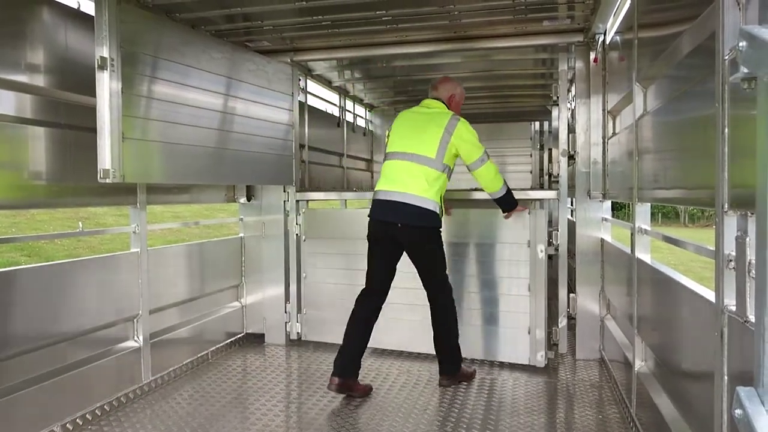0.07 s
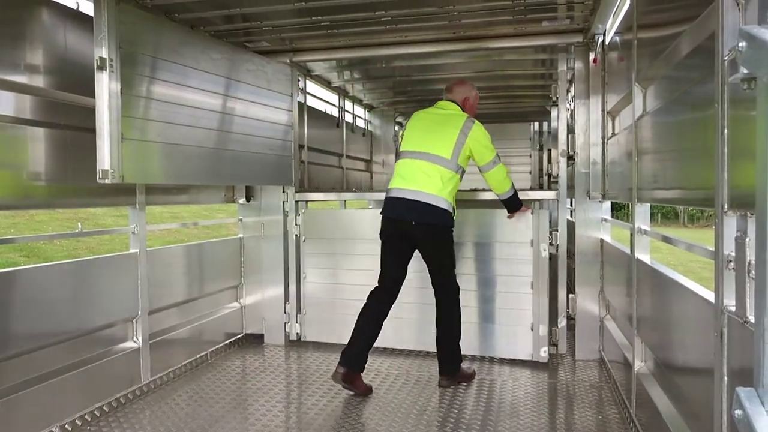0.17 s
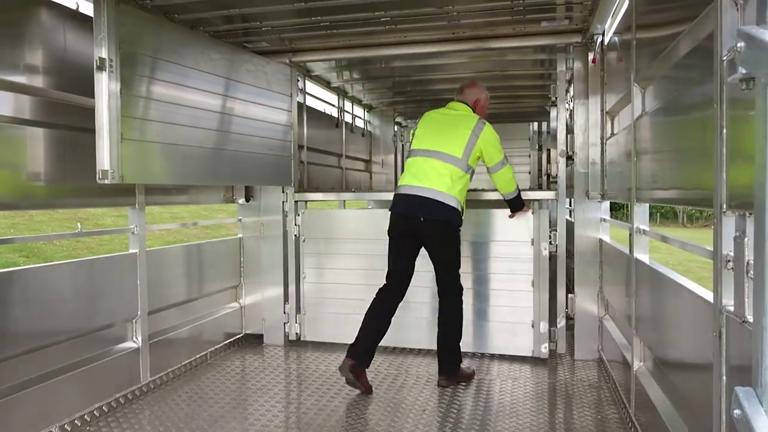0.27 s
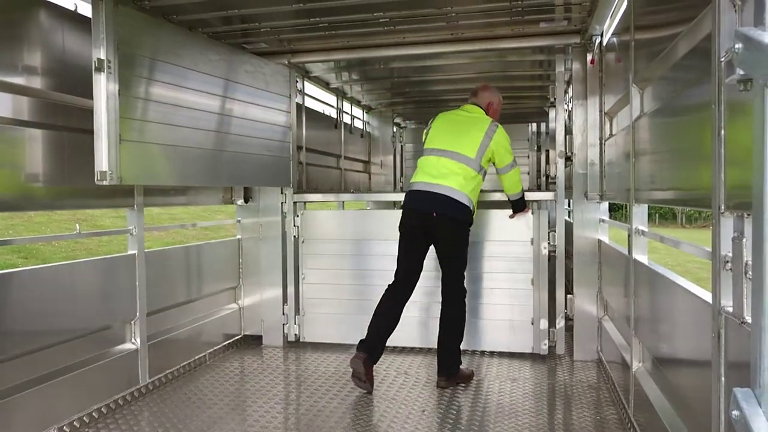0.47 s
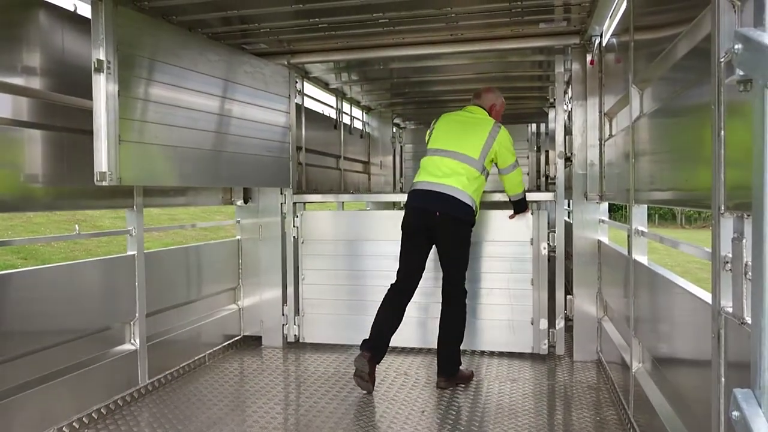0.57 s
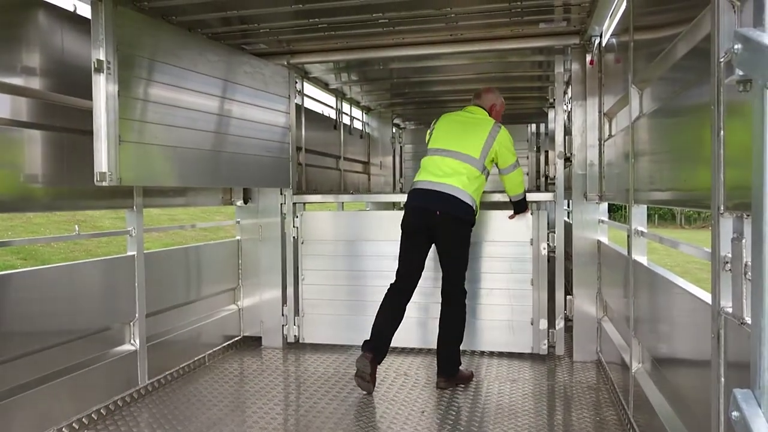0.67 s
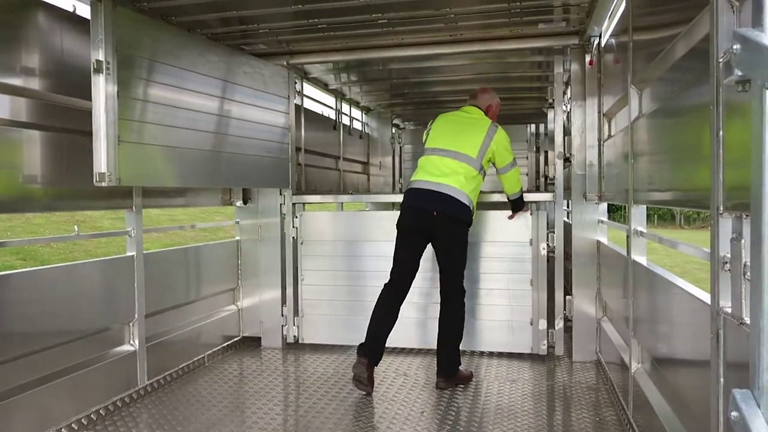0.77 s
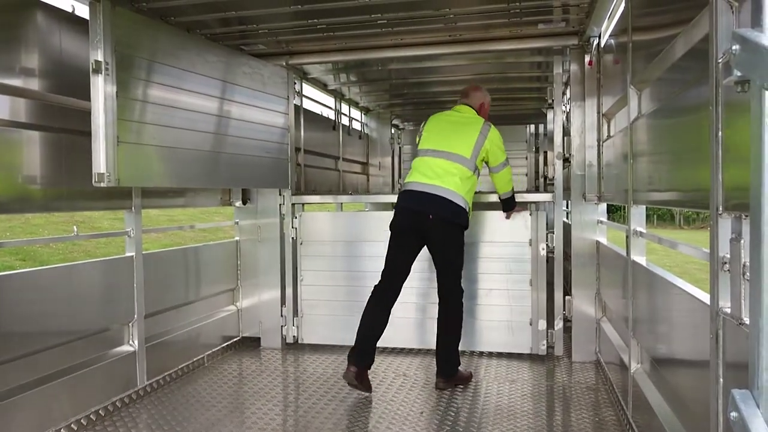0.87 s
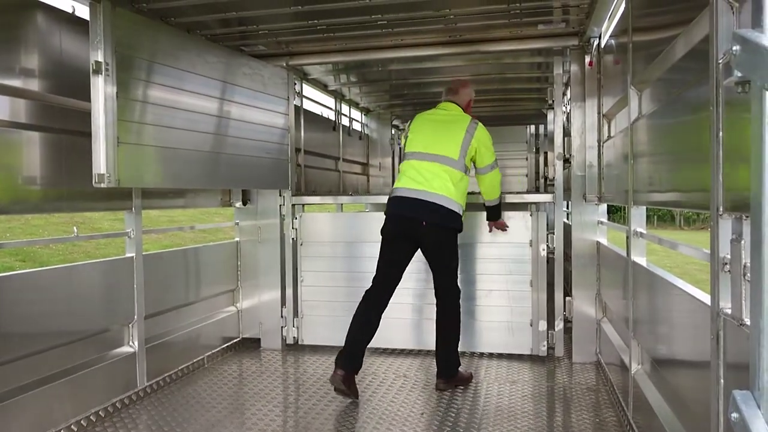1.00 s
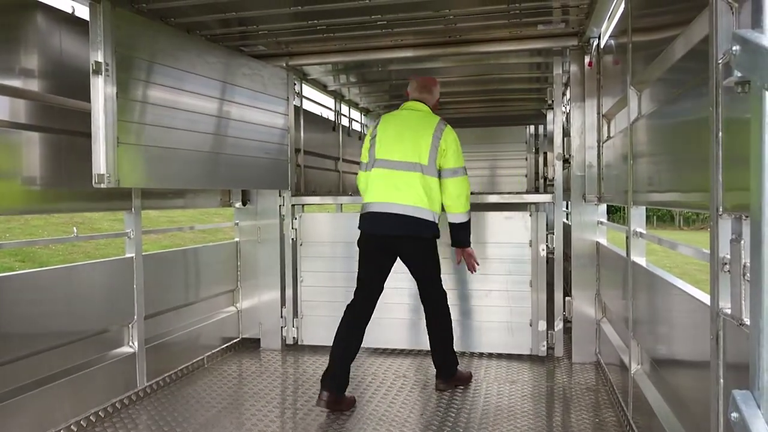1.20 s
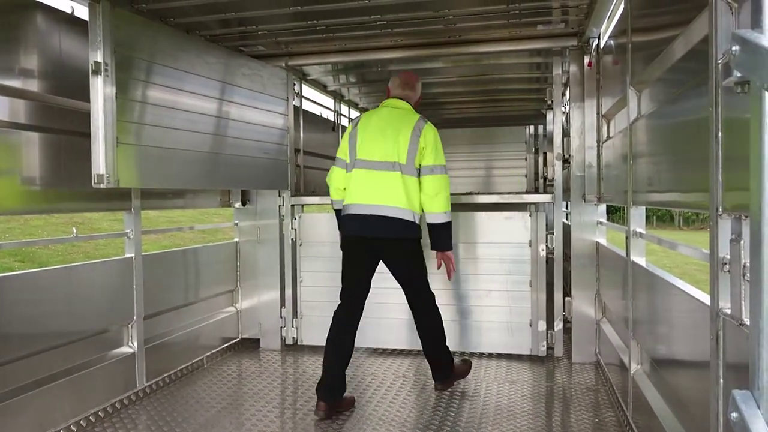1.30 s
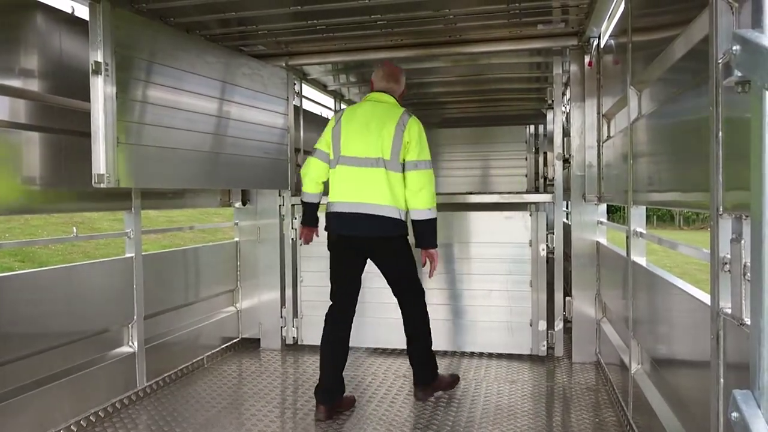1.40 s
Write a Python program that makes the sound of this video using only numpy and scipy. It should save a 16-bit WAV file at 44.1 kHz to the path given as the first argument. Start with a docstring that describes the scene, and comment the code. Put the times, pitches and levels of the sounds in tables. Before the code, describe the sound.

A metal partition gate bangs shut just after a few latch clicks, rebounding with a rattle and a hollow boom. Heard from inside the metal trailer, the ringing fades into soft steps and a low rumble from outside.

```python
"""An aluminium partition gate slams, rattles and rebounds as a man shuts it in a metal livestock trailer.
First the latch bolt clatters back; then each impact excites the panel's modes, and the walls reverberate.
The deck flexes and booms under steps and blows, loose fittings tick, and a low outdoor rumble enters
through the vents. Gain control flattens the bang."""
import sys
import numpy as np
from scipy import signal
from scipy.fft import rfft, irfft
from scipy.io import wavfile
from scipy.ndimage import uniform_filter1d, minimum_filter1d

SR = 44100
rng = np.random.default_rng(int(sys.argv[2]) if len(sys.argv) > 2 else 0)


def log_audio(samples):
    """Write samples as a 16-bit WAV file to the path given in sys.argv[1]."""
    # one column per channel
    frames = np.atleast_2d(samples).T
    # limit to full scale, then quantise
    limited = np.clip(frames, -1, 1)
    pcm = np.round(limited * 32767).astype(np.int16)
    wavfile.write(sys.argv[1], SR, pcm)


N = 63945

# reverberation of the trailer: frequency_hz, t60_s
TRAILER_DECAY = [(60, 2.5), (150, 2.06), (320, 1.35), (650, 0.63), (1500, 0.67), (3500, 0.68), (7500, 0.5),
                 (15000, 0.3)]
# likeness of the two channels: frequency_hz, coherence_ratio
COHERENCE = [(60, 0.86), (280, 0.98), (550, 0.74), (1000, 0.28), (2000, .1), (12000, 0.079)]
# stereo balance: frequency_hz, left_minus_right_db
STEREO_BALANCE = [(40, -10.5), (125, -7.5), (250, -4.5), (500, -5.5), (1000, -2), (2000, -7), (4000, -1),
                  (8000, -4.5), (14000, -1)]
# spectrum of the outdoor rumble: frequency_hz, relative_db
RUMBLE_SPECTRUM = [(28, -32), (42, -10.5), (54, 4.5), (80, -3), (140, -1.5), (220, -1), (350, -7.5),
                   (560, -14.5), (850, -9), (1400, -15.5), (2200, -15.5), (3000, -28), (5500, -38.5),
                   (7500, -36.5), (9300, -55.5), (15500, -64)]
# contacts of the bolt as it is drawn back: start_s, level_db, treble_db
BOLT_CONTACTS = [(-.08, -28.5, -17), (.2095, -29, 6), (.2165, -27.5, -3), (.2255, -32, 5.5),
                 (.2323, -24.5, 5), (.2362, -35.5, -18), (.267, -36, -10), (.3115, -33, 7)]
# broad spectrum of a bolt contact: frequency_hz, relative_db
BOLT_SPECTRUM = [(100, -30), (700, -33), (1300, 0.5), (2200, 3), (3000, -2), (4000, 1.5), (4800, -13.5),
                 (5700, -12), (6300, -14), (7600, -0.5), (8700, -21), (9500, -29), (10700, -21),
                 (12300, -33), (13500, -17), (15500, -34)]
# resonances of the bolt: pitch_hz, width_hz, relative_db
BOLT_RESONANCES = [(1606, 12, 14), (2160, 60, 11.5), (2240, 11, 19), (2700, 30, 14.5), (3738, 28, 14.5),
                   (4030, 99, 10.5), (4326, 37, -3), (5600, 97, 7), (6970, 35, 3), (7620, 78, 12.5),
                   (10500, 110, -8)]
# contacts of loose fittings: start_s, level_db, relative_ring_db
FITTING_TICKS = [(-.04, -45.5, -10), (1.171, -46.5, -21), (1.178, -46.5, -7), (1.196, -56, 2),
                 (1.429, -50, -12)]
# spectrum of a tick: frequency_hz, relative_db
FITTING_SPECTRUM = [(200, 15), (1000, -22), (2500, -4.5), (4000, 2), (5500, -8.5), (7600, -1), (9300, -20),
                    (11000, -16.5), (15500, -17)]
# the one mode of a fitting: pitch_hz, relative_db, t60_s
FITTING_RING = [(6643, 0, 0.48)]
# deck and walls flexing under steps and blows: start_s, level_db, pitch_hz, t60_s
DECK_BOOMS = [(-.01, -28, 215.8, 0.26), (.075, -31, 127, 0.32), (.145, -31, 91, .18),
              (.345, -35.5, 81, 0.35), (.46, -25.5, 96, 0.18), (0.543, -17, 87, 0.082),
              (.635, -36.5, 77.3, 0.29), (.745, -35.5, 84.4, 0.49), (0.789, -31.5, 151, 1),
              (0.886, -36.5, 230, 0.71), (.96, -33.5, 123, 0.24), (1.064, -52, 166, 0.17),
              (1.249, -31, 81.3, 0.23)]
# catch brushing its keeper just before the slam: start_s, level_db
CATCH_CONTACTS = [(0.385, -30.5), (0.389, -28), (0.3958, -40)]
# spectrum of the keeper: frequency_hz, relative_db
KEEPER_SPECTRUM = [(200, -40), (700, -24), (1400, 0), (2200, 1.5), (3000, -4), (3800, 7.5), (4700, -11),
                   (5600, -7), (7600, -4), (9400, -24), (15500, -20)]
# gate striking its frame: start_s, level_db, treble_db, bass_db
GATE_BLOWS = [(0.4131, -19.5, -7.5, -9), (.4185, -8.5, -4, -7.5), (0.4282, -15.5, 2.5, 4),
              (0.4606, -22, 5, -5), (0.4676, -16, 2, -1.5), (.498, -15.5, 7, -6), (.551, -15, 0, 1.5),
              (0.5584, -12, -3, -4.5), (.582, -14.5, 3, 1.5), (.598, -16.5, -5, -0.5), (.634, -19, -6, 1)]
# broad spectrum of the struck panel: frequency_hz, relative_db
PANEL_SPECTRUM = [(30, -58), (70, -23), (125, -5), (240, -5), (330, -1), (450, -2), (640, -6), (850, 1.5),
                  (1400, -1.5), (2100, -1), (2700, -7.5), (3700, -7), (4700, -12.5), (6300, -13),
                  (7300, -9), (8300, -17), (9400, -34), (11000, -30), (15500, -33.5)]
# modes of the panel: pitch_hz, slam_weight_db, rebound_weight_db, t60_s
GATE_MODES = [(326.8, -7, -4, 0.38), (326.7, -1, -13, 1), (358.5, 0, 0, 0.97), (487, -2.5, -27, 0.4),
              (730, -2.5, 4.5, 0.4), (784, 2, 2, 0.21), (873, -12.5, 2.5, 0.56), (915, -15, -2.5, 0.57),
              (1069, 5.5, -5, 0.41), (1315.5, 0, 5, 0.5), (1360, 6.5, -11, 0.71), (1423, 5.5, 2.5, 0.44),
              (1441, -5, 3.5, 0.45), (1485, 7, 7.5, 0.6), (1525, -20, 5.5, 0.29), (1756, -13, -20, 0.2),
              (1779, 5.5, -4, 0.62), (1787, 4, -20, 0.44), (1894, 0, -2, 0.74), (2008, 9, -8, 0.18),
              (2140, 11.5, -15, 0.2), (2261, 7.5, -15, 0.56)]
# soles landing on the deck: start_s, level_db
FOOTFALLS = [(1.126, -43.5), (1.191, -38), (1.27, -43)]
# spectrum of a footfall: frequency_hz, relative_db
SOLE_SPECTRUM = [(50, 2), (200, -9), (400, 7), (600, -22), (950, 2.5), (2000, -28), (4000, -38),
                 (15000, -85)]

RESPONSE_SAMPLES, ONSET_S = 49152, 0.00085
T, HZ = np.arange(RESPONSE_SAMPLES) / SR, np.fft.rfftfreq(RESPONSE_SAMPLES, 1 / SR)
TREBLE_HZ, BASS_HZ = 2780, 396
TREBLE_SHELF, BASS_SHELF = HZ ** 4 / (HZ ** 4 + TREBLE_HZ ** 4), 1 / (1 + (HZ / BASS_HZ) ** 2)


def amp(db):
    """Amplitude grows tenfold for every 20 dB."""
    return 10 ** (np.asarray(db) / 20)


def unit(x):
    """Normalisation to an rms of 1."""
    return x / np.sqrt(np.mean(abs(x) ** 2) + 1e-20)


def curve(points, hz):
    """Interpolation on a logarithmic frequency axis."""
    knots_hz, values = np.transpose(points)
    return np.interp(np.log(hz + 1), np.log(knots_hz + 1), values)


def add(mix, start_s, sound):
    """Superposition: a stereo sound adds to the mix from start_s, which may be negative."""
    at = round(start_s * SR)
    sound, part = sound[:, max(-at, 0):], mix[:, max(at, 0):]
    part[:, :sound.shape[1]] += sound[:, :part.shape[1]]


def stereo(spectra, hz):
    """Partial coherence: two independent spectra blend, alike in the bass and louder on the right."""
    coherence, lean = curve(COHERENCE, hz), amp(curve(STEREO_BALANCE, hz) / 2)
    left = coherence * spectra[0] + np.sqrt(1 - coherence ** 2) * spectra[1]
    return np.array([left * lean, spectra[0] / lean])


def colour(x, shape_db):
    """Minimum-phase filtering: a folded cepstrum gives a causal response, here of unit rms gain."""
    cepstrum = irfft(np.log(unit(amp(shape_db)) + 1e-6))
    cepstrum[1:RESPONSE_SAMPLES // 2] *= 2
    cepstrum[RESPONSE_SAMPLES // 2 + 1:] = 0
    return irfft(rfft(x) * np.exp(rfft(cepstrum)))


def decay(t, t60_s):
    """Damping: amplitude falls exponentially, by 60 dB in t60_s."""
    return np.exp(-np.log(1000) * t / np.maximum(t60_s, 1e-3))


def free_vibration(modes):
    """Free vibration is a sum of damped sinusoids, with new random phases at every contact."""
    hz, db, t60_s = np.transpose(modes)
    phases = np.exp(2j * np.pi * rng.random((len(hz), 2))).T
    amplitudes = stereo(phases, hz) * amp(db) / np.linalg.norm(amp(db))
    waves = np.exp(2j * np.pi * hz[:, None] * T) * decay(T, t60_s[:, None])
    return np.sqrt(2) * (amplitudes @ waves).real * (1 - np.exp(-T / ONSET_S))


def trailer_reverb(t60_scale=1, early_db=-2, early_t60_s=0.18):
    """Reverberation between metal walls: strong early reflections, then a tail longest in the bass."""
    reflections = rng.standard_normal((2, len(T))) * (rng.integers(0, 12, (2, len(T))) == 0)
    hz, t, spectra = signal.stft(unit(reflections), SR, nperseg=512)
    t60_s = t60_scale * curve(TRAILER_DECAY, hz)[:, None]
    tail = signal.istft(stereo(spectra, hz[:, None]) * decay(t, t60_s), SR, nperseg=512)[1][:, :len(T)]
    early_lift = 1 + amp(early_db) * decay(T, early_t60_s)
    return tail * early_lift * (1 - np.exp(-T / ONSET_S)) / np.sqrt(2)


def outdoor_rumble(level_db=-35.5, drift_db=2):
    """Transmission through openings: low noise enters by the side vents, its spectrum drifting."""
    frames = dict(fs=SR, nperseg=2048, noverlap=1536)
    hz, _, spectra = signal.stft(rng.standard_normal((2, N)), **frames)
    patches = uniform_filter1d(rng.standard_normal(spectra.shape[1:]), size=12, axis=0)
    patches = unit(uniform_filter1d(patches, size=8, axis=1))  # smooth in frequency, then in time
    shape_db = curve(RUMBLE_SPECTRUM, hz)[:, None] + drift_db * patches
    rumble = signal.istft(stereo(spectra, hz[:, None]) * amp(shape_db), **frames)[1][:, :N]
    return amp(level_db) * unit(rumble)


def latch_bolt(resonance_db=-0.5):
    """Resonance: each contact of the sliding bolt rings at the narrow peaks of its spectrum."""
    out = np.zeros((2, N))
    peak_power = sum(amp(db + resonance_db) ** 2 / (1 + (2 * (HZ - hz) / width_hz) ** 2) ** 2
                     for hz, width_hz, db in BOLT_RESONANCES)
    bolt_db = 10 * np.log10(amp(curve(BOLT_SPECTRUM, HZ)) ** 2 + peak_power)
    for start_s, level_db, treble_db in BOLT_CONTACTS:
        clack = colour(trailer_reverb(t60_scale=0.67), bolt_db + treble_db * TREBLE_SHELF)
        add(out, start_s, amp(level_db) * clack)
    return out


def loose_fittings():
    """Impulse excitation: a light metal contact gives a broadband tick and one thin ringing mode."""
    out = np.zeros((2, N))
    for start_s, level_db, ring_db in FITTING_TICKS:
        tick = colour(trailer_reverb(t60_scale=0.99), curve(FITTING_SPECTRUM, HZ))
        ring = amp(ring_db) * free_vibration(FITTING_RING)
        add(out, start_s, amp(level_db) * (tick + ring))
    return out


def deck_booms(rise_s=0.015):
    """Flexural vibration: floor and walls answer a step or blow with one low, damped mode."""
    out = np.zeros((2, N))
    swell = 1 - np.exp(-(T / rise_s) ** 2)
    for start_s, level_db, hz, t60_s in DECK_BOOMS:
        add(out, start_s, amp(level_db) * free_vibration([(hz, 0, t60_s)]) * swell)
    return out


def catch_clicks():
    """Brief, hard contact reaches high frequencies: the catch clicks as it brushes its keeper."""
    out = np.zeros((2, N))
    for start_s, level_db in CATCH_CONTACTS:
        click = colour(trailer_reverb(t60_scale=0.86), curve(KEEPER_SPECTRUM, HZ))
        add(out, start_s, amp(level_db) * click)
    return out


def gate_slam():
    """Impact excitation: each blow on the frame gives a broadband bang, a rattle and a ringing panel."""
    out = panel_ring()
    for start_s, level_db, treble_db, bass_db in GATE_BLOWS:
        shape_db = curve(PANEL_SPECTRUM, HZ) + treble_db * TREBLE_SHELF + bass_db * BASS_SHELF
        add(out, start_s, amp(level_db) * colour(trailer_reverb() + rattle(), shape_db))
    return out


def panel_ring(gain_db=-20, rebound_s=0.54, rise_s=0.0026, waver_depth=0.5, hop=64):
    """Modal excitation: a blow feeds each mode according to where it lands; the ring wavers and decays."""
    t, out = np.arange(N) / SR, np.zeros((2, N))
    start_s, blow_db, _, _ = np.transpose(GATE_BLOWS)[:, :, None]
    age_s = np.maximum(t[::hop] - start_s, 0)
    for hz, slam_db, rebound_db, t60_s in GATE_MODES:
        strengths = amp(blow_db + np.where(start_s < rebound_s, slam_db, rebound_db))
        shares = strengths * decay(age_s, t60_s) * (1 - np.exp(-age_s / rise_s))
        envelope = np.linalg.norm(shares, axis=0)  # the blows add in energy
        slow_noise = uniform_filter1d(rng.standard_normal((2, age_s.shape[1], 2)), size=50, axis=1)
        drift = unit(slow_noise @ np.array([1, 1j]))
        phases = np.exp(2j * np.pi * rng.random((2, 1)))
        phasors = stereo(phases + waver_depth * drift, hz) * envelope
        amplitude = np.array([np.interp(t, t[::hop], side) for side in phasors])
        out += (amplitude * np.exp(2j * np.pi * hz * t)).real
    return amp(gain_db) * np.sqrt(2) * out


def rattle(contacts_per_s=540, t60_s=0.31, gain_db=-13.5):
    """Secondary impacts: loose parts collide at random times, ever more weakly after a blow."""
    clicks = rng.standard_normal((2, len(T))) * (rng.random((2, len(T))) < contacts_per_s / SR)
    return amp(gain_db) * irfft(stereo(rfft(unit(clicks)), HZ)) * decay(T, t60_s)


def footsteps():
    """Soft contact carries little treble: soles land on the deck with a dull thud."""
    out = np.zeros((2, N))
    for start_s, level_db in FOOTFALLS:
        thud = colour(trailer_reverb(t60_scale=0.66), curve(SOLE_SPECTRUM, HZ))
        add(out, start_s, amp(level_db) * thud)
    return out


def scene():
    """Superposition: the pressures of all sources in the trailer add."""
    metal = gate_slam() + latch_bolt() + catch_clicks() + loose_fittings()
    return metal + deck_booms() + footsteps() + outdoor_rumble()


def record(dry, threshold_db=-7, cut_share=0.2, detector_fall_db_per_s=11, ceiling=0.92, edge_hz=15750):
    """Compression with slow release holds the bang down; a peak limiter and a low-pass filter follow."""
    power_db = 10 * np.log10(abs(uniform_filter1d((dry ** 2).mean(0), size=256)) + 1e-12)
    fall_db = np.arange(N) * detector_fall_db_per_s / SR
    detector_db = np.maximum.accumulate(power_db + fall_db) - fall_db
    excess_db = np.maximum(detector_db - threshold_db, 0)
    compressed = dry / amp(cut_share * uniform_filter1d(excess_db, size=128))
    peak_gain = ceiling / np.maximum(abs(compressed).max(0), ceiling)
    limited = compressed * uniform_filter1d(minimum_filter1d(peak_gain, size=129), size=129)
    lowpass = signal.firwin(511, edge_hz, window=("kaiser", 9), fs=SR)
    return signal.oaconvolve(limited, lowpass[None], "same")


dry = scene()
out = record(dry)
log_audio(out)
```